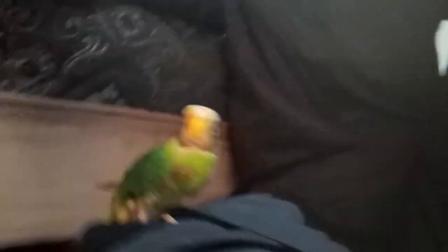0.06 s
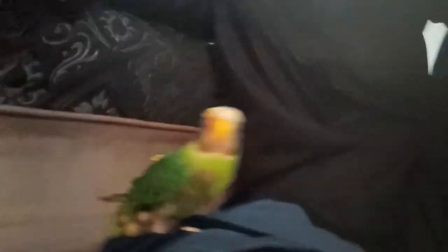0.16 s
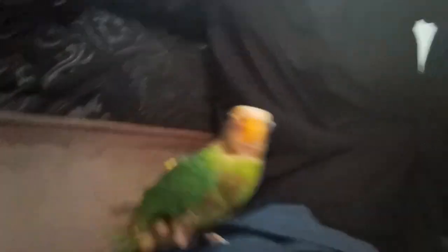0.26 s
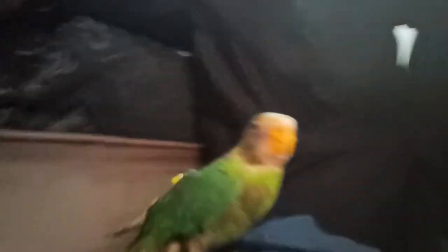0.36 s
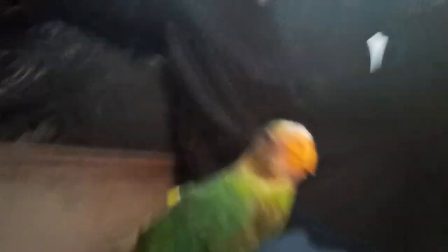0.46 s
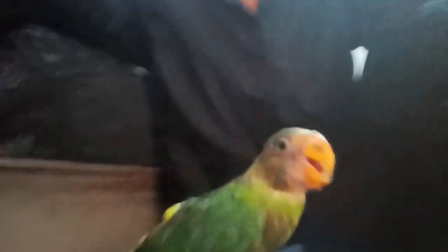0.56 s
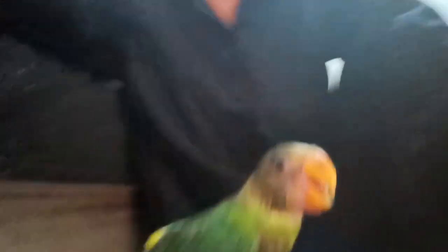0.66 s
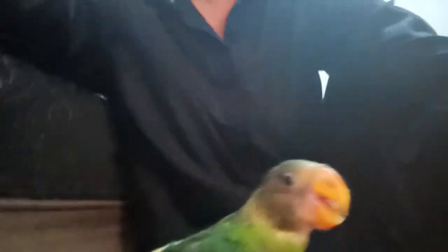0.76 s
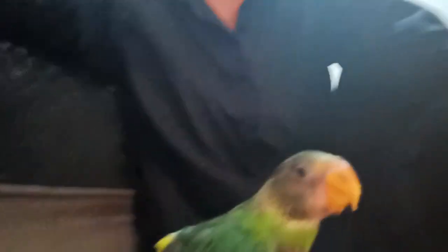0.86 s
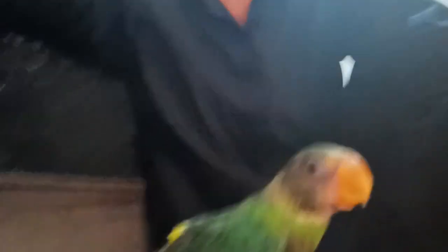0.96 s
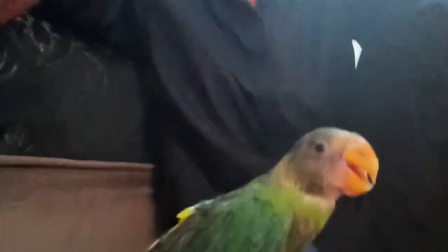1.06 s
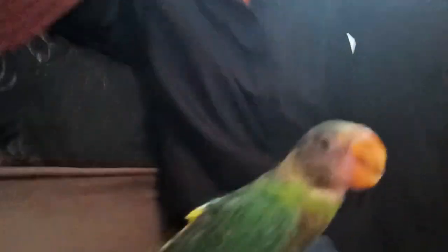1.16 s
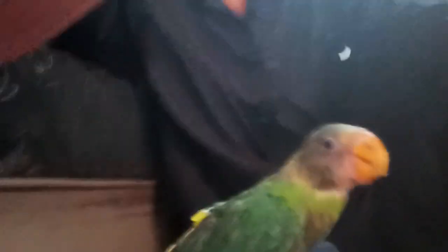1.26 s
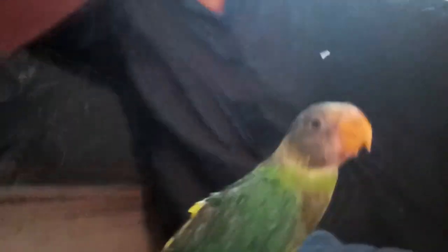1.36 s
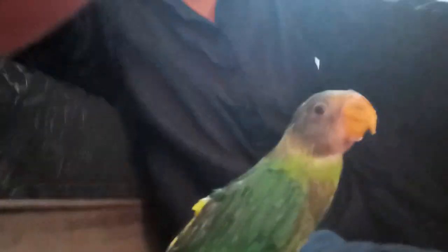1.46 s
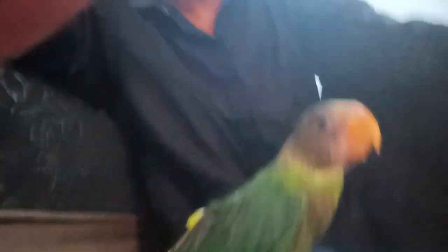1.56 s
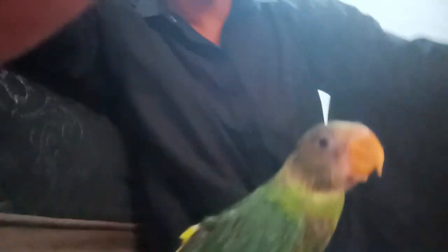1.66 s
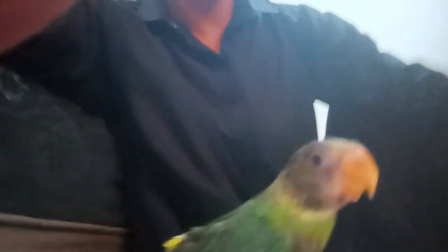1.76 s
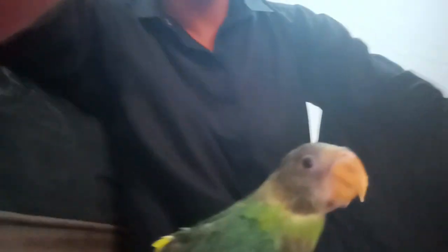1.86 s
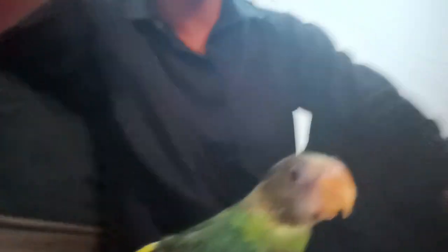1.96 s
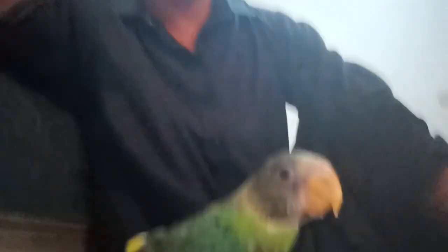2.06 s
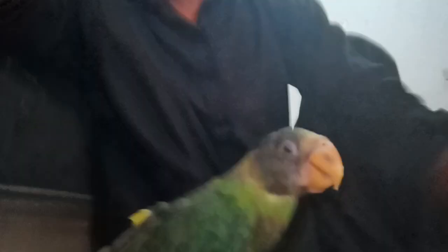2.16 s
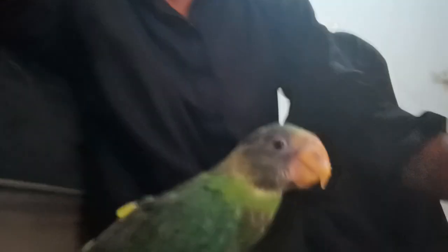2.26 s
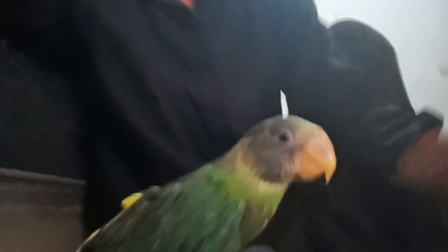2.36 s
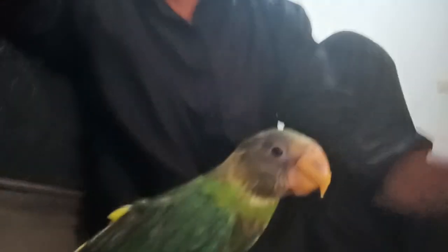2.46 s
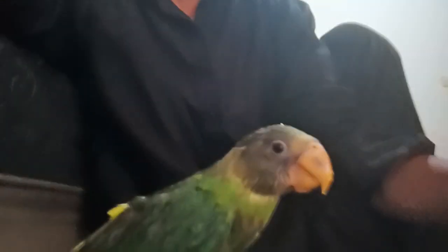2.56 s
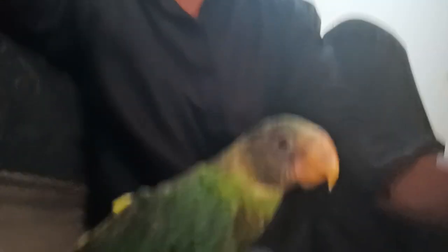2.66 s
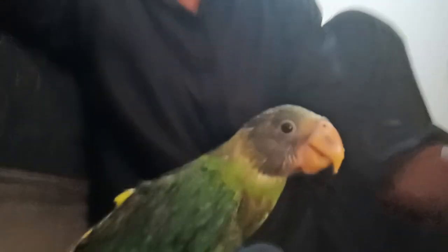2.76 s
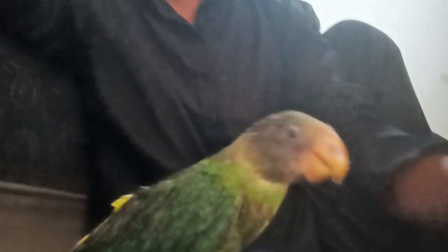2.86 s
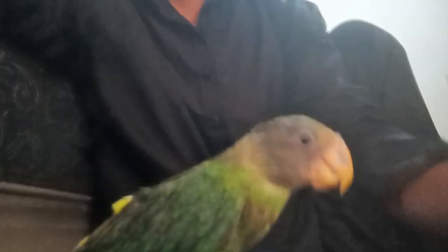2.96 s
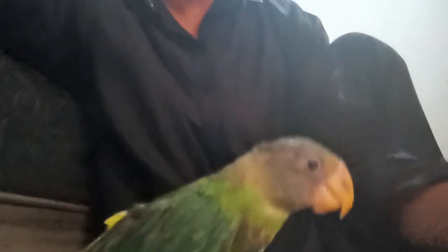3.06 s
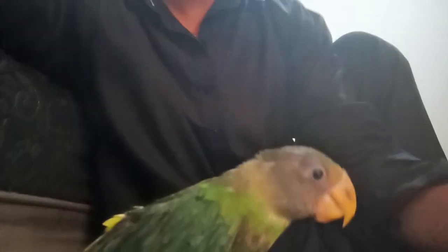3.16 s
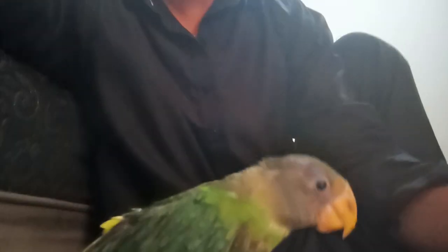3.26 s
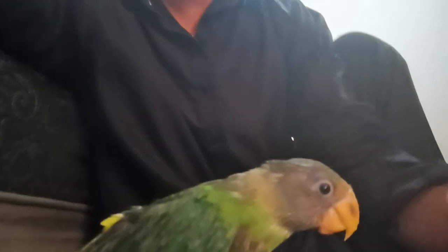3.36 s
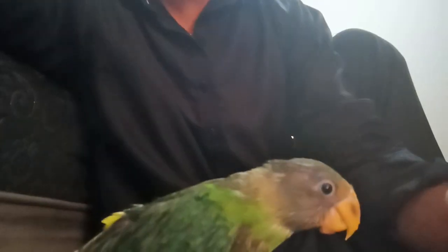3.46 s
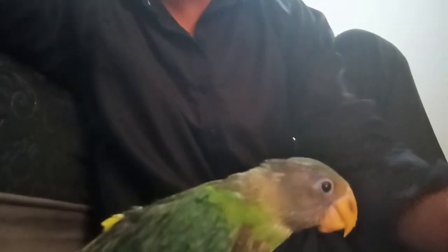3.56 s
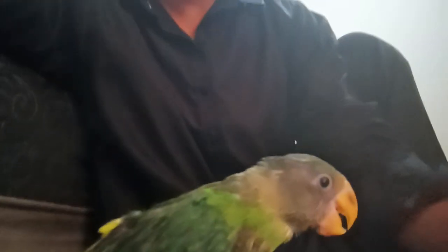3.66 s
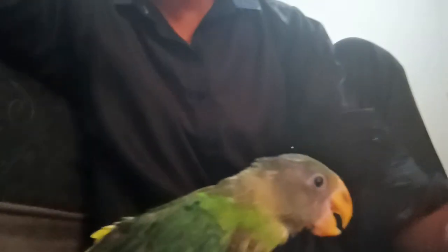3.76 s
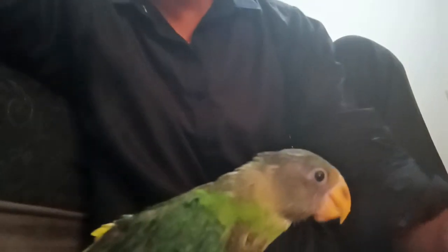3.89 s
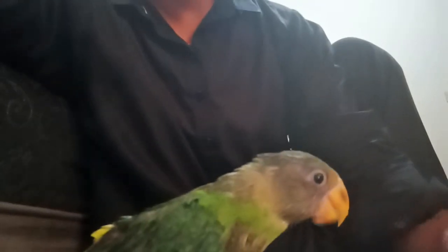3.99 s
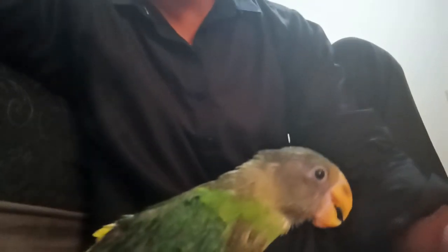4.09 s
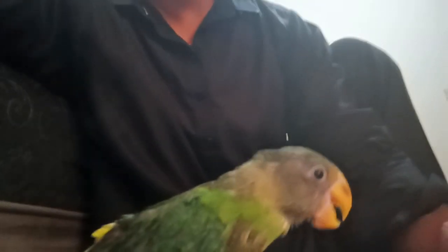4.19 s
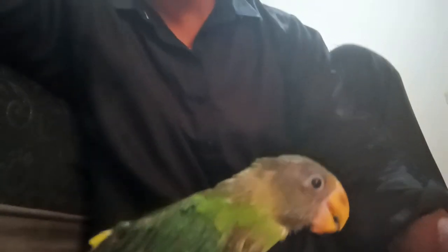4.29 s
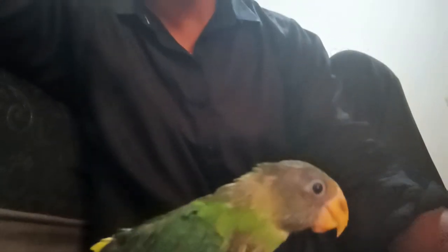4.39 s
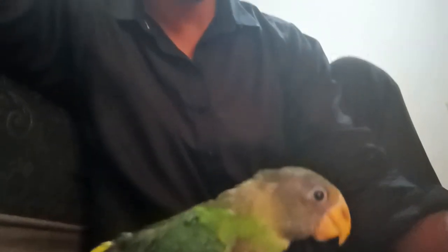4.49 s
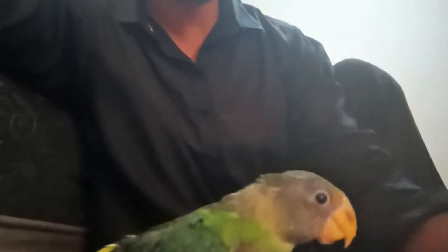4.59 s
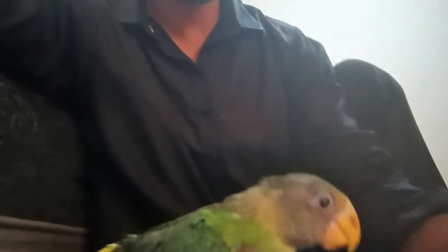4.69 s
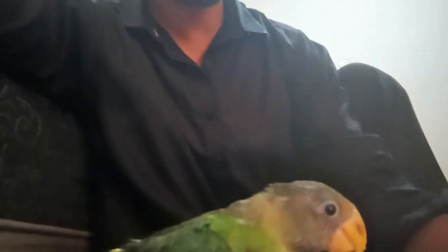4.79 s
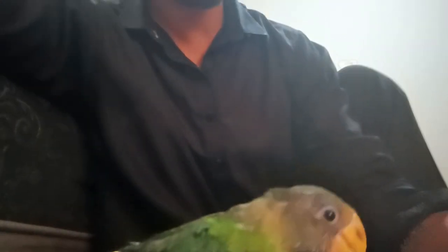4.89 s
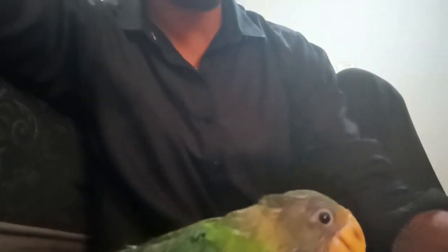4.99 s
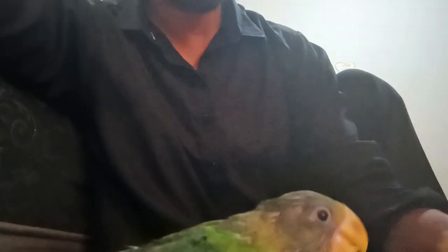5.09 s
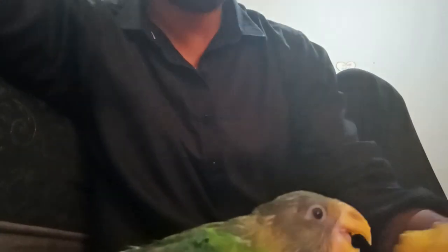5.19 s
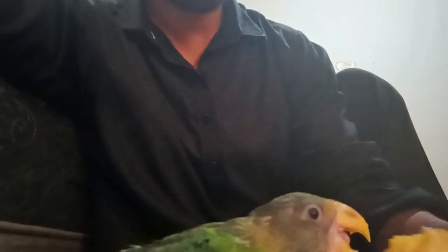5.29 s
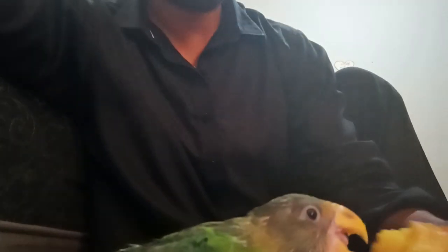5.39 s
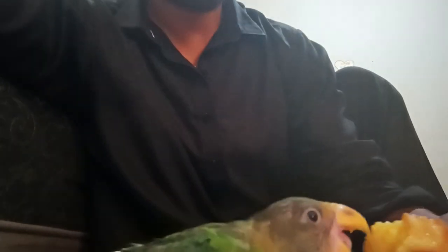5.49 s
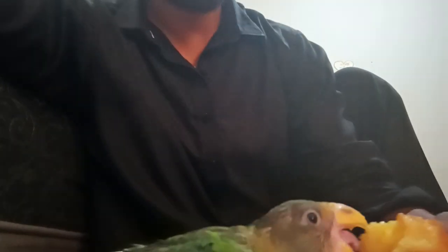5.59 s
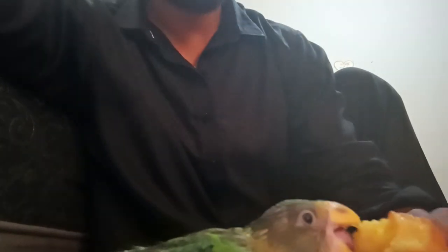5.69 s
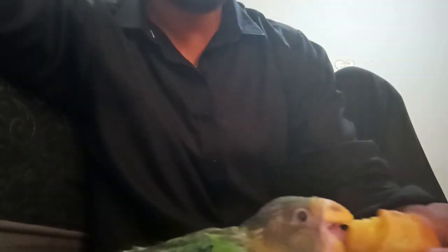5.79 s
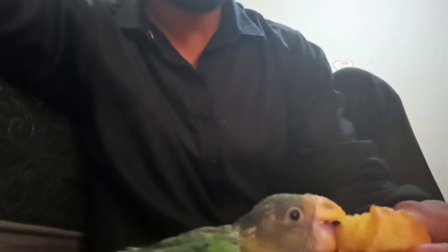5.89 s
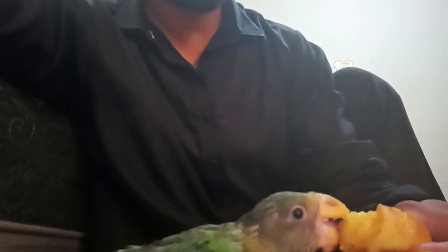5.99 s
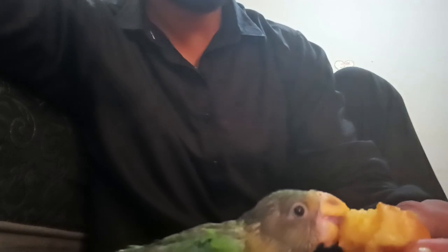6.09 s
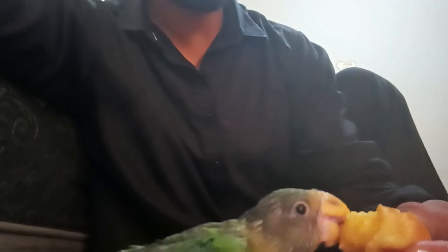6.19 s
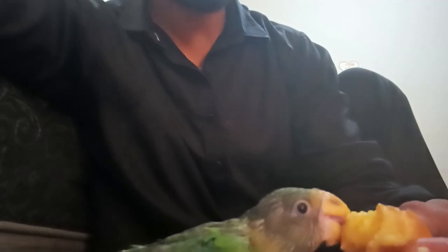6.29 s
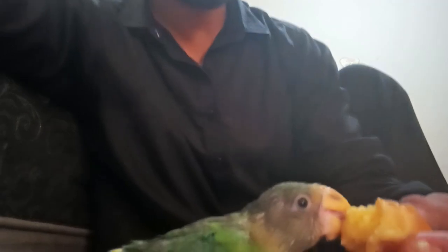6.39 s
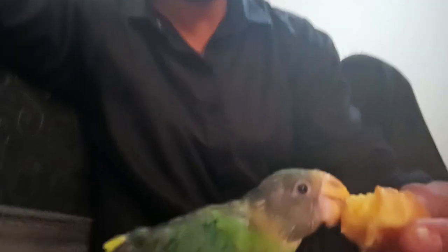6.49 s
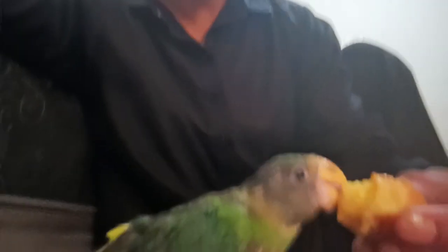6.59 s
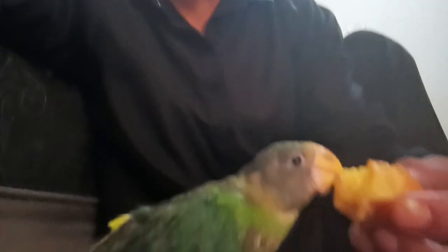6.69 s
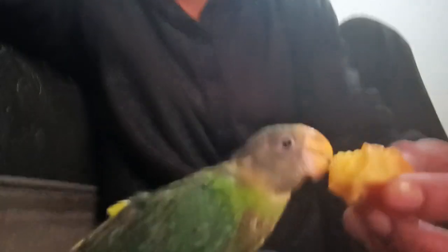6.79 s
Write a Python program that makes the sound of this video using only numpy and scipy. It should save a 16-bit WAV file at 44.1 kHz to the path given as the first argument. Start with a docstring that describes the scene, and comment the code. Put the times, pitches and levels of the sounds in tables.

```python
"""A small parrot close to the microphone gives two pairs of harsh squawks in a living room.
Each squawk is one harmonic tone whose base pitch rises, holds and falls at the end, while the
syrinx swings it up and down about sixty times a second; throat and beak filter it, the room reverberates.
Beak clicks are ticks of bright noise, knocks ring the recorder's case, hand bumps and a sleeve are shaped
noise, hum and hiss are steady coloured noise; gain control turns loud sound down."""
import sys
import numpy as np
from scipy import signal
from scipy.fft import rfft, irfft, next_fast_len
from scipy.io import wavfile
from scipy.ndimage import uniform_filter1d, minimum_filter1d

SR = 44100
rng = np.random.default_rng(int(sys.argv[2]) if len(sys.argv) > 2 else 0)


def transcribe(u):
    """Save the signal u as a 16-bit wav file named by the first command-line argument.

    u: samples, shape (n,) or (channels, n), limited to [-1, 1]; the rate is SR.
    q: integer samples, one column per channel.
    """
    v = np.clip(np.atleast_2d(u).T, -1, 1)
    q = np.round(v * 32767).astype(np.int16)
    wavfile.write(sys.argv[1], SR, q)


N = 301714
TIME = np.arange(N) / SR
CUTOFF_HZ = 15900     # upper edge of the recorded band
PLATEAU_HZ = 1836     # base pitch on the plateau, before each call's own pitch factor


def from_db(db):
    """Level to amplitude: 20 dB is a factor of ten."""
    return 10 ** (np.asarray(db) / 20)


def rms_one(x):
    """Normalization to unit mean-square power."""
    return x / np.sqrt(np.mean(x ** 2) + 1e-20)


def ramp(x):
    """Linear transition: x held between 0 and 1."""
    return np.clip(x, 0, 1)


def along(rows, at):
    """Piecewise-linear interpolation of every column of a table."""
    first, *columns = np.transpose(rows)
    return [np.interp(at, first, c) for c in columns]


def at_hz(points, hz):
    """Spectral interpolation on a logarithmic frequency axis."""
    f, value = np.transpose(points)
    return np.interp(np.log(np.maximum(hz, 1)), np.log(f), value)


def band(x, low_hz, high_hz):
    """Causal band-pass filtering (Butterworth)."""
    edges = [low_hz, min(high_hz, .45 * SR)]
    return signal.sosfilt(signal.butter(2, edges, "band", fs=SR, output="sos"), x + 1e-18)


def noise(spectrum):
    """Spectral shaping: white noise weighted by a colour, at unit power."""
    size = next_fast_len(N)
    white = rfft(rng.standard_normal(size))
    hz = np.arange(len(white)) * SR / size
    return rms_one(irfft(white * from_db(at_hz(spectrum, hz)), size)[:N])


def wander(rate_hz, size):
    """Band-limited random motion: random values joined by straight lines, spread 1."""
    steps = np.arange(size) * rate_hz / SR
    return rms_one(np.interp(steps, np.arange(size), rng.standard_normal(size)))


def taps(rows):
    """Impulse excitation: one impulse for each (t/s, level/dB) row."""
    out = np.zeros(N)
    for s, db in rows:
        out[int(s * SR)] = from_db(db)
    return out


def fading(rows, t60):
    """Exponential decay: an envelope that jumps at each event and falls 60 dB in t60 seconds."""
    return signal.lfilter([1], [1, -from_db(-60 / (t60 * SR))], taps(rows) + 1e-18)


def ring(clicks, hz, t60):
    """Damped resonance: a unit click sets a decaying sine of height 1 ringing."""
    r, w = from_db(-60 / (t60 * SR)), 2 * np.pi * hz / SR
    return signal.lfilter([0, np.sin(w)], [1, -2 * r * np.cos(w), r * r], clicks + 1e-18)


def parrot():
    """Superposition of direct sound and near reflections; the feed of the diffuse field is kept apart."""
    # the calls: start t/s, end t/s, level/dB, room send/dB, pitch factor, first warble trough t/s,
    # warble at start f/Hz, warble at end f/Hz, head turn [0-1], push at the start/dB, sag by the end/dB
    squawks = [(.464, .734, 0, -26.5, 0.98, .4868, 69.4, 56.85, 0, -1.5, -0.5),
               (.916, 1.173, 2.5, -25.5, .99, .9419, 64.65, 57.4, 0.29, 0, 5),
               (3.545, 3.807, -2.5, -20.5, 1.005, 3.570, 65.9, 61.3, 0.87, 0, 2.5),
               (3.988, 4.247, -3.5, -19.5, 1.025, 4.0175, 65.8, 55.13, 0.89, -1.5, 0)]
    # reflections off hard surfaces near the bird: delay t/s, level/dB
    near_echoes = [(.0013, -38.5), (.0034, -26.5), (.0061, -31), (.0093, -22)]
    direct, spread = np.zeros((2, N))
    for start, end, db, room_db, pitch, trough, *manner in squawks:
        call = from_db(db) * squawk(end - start, pitch, trough - start, *manner)
        at = int(start * SR)
        direct[at:at + len(call)] += call
        spread[at:at + len(call)] += from_db(room_db) * call
    echoes = sum(from_db(db) * np.interp(TIME - delay, TIME, direct) for delay, db in near_echoes)
    return direct + echoes, spread


def squawk(length, pitch, trough, start_hz, end_hz, turn, push_db, sag_db):
    """Source-filter principle: a frequency-modulated harmonic source drives throat and beak."""
    lean, crest = .45, 1.7             # asymmetry of the warble; exponent that narrows its troughs
    trough_drop_db, break_db, break_s = 5.5, 8, .007
    t = np.arange(int(length * SR)) / SR
    size = len(t)
    low, depth = tension(t / length)
    high = low * (1 + (1.68 - 1) * depth)    # at full depth the crest lies 1.68 times above the base
    effort_db, octave_db, slope_db, rasp = voice(low, depth)

    # the warble rate glides through the call; each swing climbs slowly, rounds off and drops fast
    turns = np.cumsum(start_hz + (end_hz - start_hz) * t / length) / SR
    angle = 2 * np.pi * (turns - np.interp(trough, t, turns))
    leaning = angle - lean * .5 * (1 - np.cos(angle))
    slack = (.5 + .5 * np.cos(leaning)) ** crest

    # the taut crests hold their pitch; the slack troughs stray, and the membranes beat unevenly
    sway = .025 * np.sqrt(slack) * wander(400, size)
    jitter = .04 * rasp * wander(3000, size)
    drift = .011 * wander(60, size)
    f0 = pitch * (high - (high - low) * slack) * (1 + sway + jitter + drift)
    phase = 2 * np.pi * np.cumsum(f0) / SR

    # the membranes close harder while the pitch climbs, which adds overtones
    slope_db = slope_db + 1.5 * np.sin(angle)
    tone = np.zeros(size)
    for k in range(1, 20):
        height = from_db(slope_db * np.log2(k) + octave_db * (k == 2)) * (k * f0 < CUTOFF_HZ)
        # they close in a rolling wave, so the overtones lag and each pulse is smeared
        partial = np.sin(k * phase + .49 * k * (k - 1))
        shimmer = 1 + .55 * rasp * np.log2(k + 1) * .5 * wander(2000, size)
        tone += height * partial * shimmer
    # in the rasp, strong and weak cycles alternate in short spells
    tone = tone * (1 + .38 * rasp * wander(250, size) * np.sin(phase / 2))
    # air escapes in a puff on every cycle
    air = from_db(-22) * np.sqrt(rasp.clip(0)) * rng.standard_normal(size) * (1 + np.cos(phase))

    # the flow is weakest just before each trough; the first one has an extra drop
    shut = (.5 + .5 * np.cos(angle + .22)) ** 2
    drop_db = trough_drop_db * depth + break_db * np.exp(-((t - trough) / break_s) ** 2)
    # each call starts softly and swells
    swell_db = -9.5 * np.exp(-t / .012) + push_db * np.exp(-t / .063)
    uneven_db = .8 * wander(120, size)
    level_db = effort_db + swell_db - sag_db * (t / length) ** 2 - drop_db * shut + uneven_db
    edges = ramp(t / .001) * ramp((length - t) / .0068)
    return throat((tone + air) * edges * from_db(level_db), ramp(turn))


def tension(share):
    """Membrane tension sets pitch: base pitch in Hz and warble depth (0-1) by share of the call's length."""
    start_hz, scoop_hz, end_hz = 596.7, 1000, 1153
    scoop = (start_hz - scoop_hz) * np.exp(-share / .04)
    climb = scoop_hz + (PLATEAU_HZ - scoop_hz) * ramp(share / .48)
    fall = (end_hz - PLATEAU_HZ) * ramp(1 - (1 - share) / .11)
    # the warble sets in after the start and stops during the fall
    depth = ramp((share - .05) / .07) * ramp((1 - share - .052) / .05)
    return scoop + climb + fall, depth


def voice(base_hz, depth):
    """Source strength and spectrum follow tension: below the plateau a slack syrinx is weaker and raspier."""
    octaves = np.log2(PLATEAU_HZ / base_hz)
    effort_db = 5 - 5.5 * octaves
    second_harmonic_db = 2.3 + 5.5 * octaves * depth
    overtone_slope_db = -5             # per octave of harmonic number
    # rasp (0-1) grows faster with slackness while the tone warbles than while it is steady
    rasp_per_octave = .16 * (1 - depth) + 1.0 * depth
    return effort_db, second_harmonic_db, overtone_slope_db, ramp(.17 + rasp_per_octave * octaves)


def throat(source, turn):
    """Vocal-tract resonance: a minimum-phase filter coloured by throat, beak and head direction."""
    # response heard from the front: f/Hz, level/dB
    beak_front = [(600, -19.5), (1300, -13), (1900, -4.5), (2450, 6), (3100, 1), (3500, -8), (4200, -0.5),
                  (5200, -5.5), (6150, -3), (7000, -13.5), (8400, -11.5), (9600, -19.5), (13000, -21),
                  (15000, -17.5)]
    # response with the head turned: f/Hz, level/dB
    beak_turned = [(600, -18.5), (1300, -15), (1900, -6.5), (2500, -8), (3100, 0), (3600, -1.5),
                   (4200, -2.5), (5400, -5.5), (6200, -1.5), (7100, -18.5), (8200, -4), (9600, -7.5),
                   (11000, -23), (14800, -15)]
    size = 2 ** 14
    hz = np.arange(size // 2 + 1) * SR / size
    gain = from_db((1 - turn) * at_hz(beak_front, hz) + turn * at_hz(beak_turned, hz))
    # folding the cepstrum onto positive time makes the filter minimum-phase
    fold = np.r_[1, np.full(size // 2 - 1, 2), 1, np.zeros(size // 2 - 1)]
    causal = np.exp(rfft(irfft(np.log(gain)) * fold))
    return irfft(rfft(source, size) * causal)


def beak_clicks():
    """Transient broadband radiation: tiny bright ticks of decaying noise."""
    # small clicks of the beak: t/s, level/dB
    ticks = [(2.952, -57), (4.612, -50.5), (4.953, -55), (6.68, -58)]
    return band(rng.standard_normal(N) * fading(ticks, t60=.03), 4000, 15500)


def room(x):
    """Diffuse reverberation: convolution with octave bands of noise, each with its own decay time."""
    # reverberation time: f/Hz, t60/s
    room_t60 = [(300, 0.15), (3000, 0.4), (6000, 0.36), (15000, 0.24)]
    gap_s, wet_db = .0073, 2.5
    t = TIME[:SR * 3 // 4]
    edges = np.geomspace(250, 16000, 7)
    tail = np.zeros(len(t))
    for lo, hi in zip(edges, edges[1:]):
        decay = from_db(-60 * t / at_hz(room_t60, np.sqrt(lo * hi)))
        tail += band(rng.standard_normal(len(t)), lo, hi) * decay
    tail = tail * (t > gap_s)
    return from_db(wet_db) * signal.fftconvolve(x, tail / np.linalg.norm(tail))[:N]


def handling():
    """Structure-borne sound: knocks excite modes of the recorder's case; the hand adds dull thuds."""
    # sharp knocks on the recorder: t/s, relative level/dB
    knocks = [(.9755, 7), (1.001, -3.5), (1.009, 0), (1.018, -10)]
    # modes of its case: f/Hz, relative level/dB, t60/s
    case = [(139, -21, 0.031), (470, -15, 0.027), (870, 2.5, 0.0028)]
    # firm bumps of the hand: t/s, relative level/dB
    bumps = [(1.314, -23), (1.359, -27.5), (1.498, -34.5), (1.807, -34.5), (2.122, -31), (3.843, -27),
             (3.884, -36), (4.519, -33), (4.659, -29.5), (6.029, -40), (6.617, -33), (6.757, -33)]
    ringing = sum(from_db(db + 2) * ring(taps(knocks), hz, t60) for hz, db, t60 in case)
    # colour of the thuds: f/Hz, level/dB
    thud = noise([(25, -27), (55, 0.5), (85, 2), (130, 0.5), (220, -13.5), (600, -24.5)])
    thuds = band(thud * fading([*bumps, *fidgets()], t60=0.27), 35.7, 420)
    return ringing + from_db(-0.5) * thuds


def fidgets():
    """Random point process: light shifts of the fingers as rows of t/s, relative level/dB."""
    per_s, middle_db, spread_db = 3, -45.5, 1
    draws = rng.random((int(per_s * N / SR), 2))
    return [(when * TIME[-1], middle_db + spread_db * (2 * size - 1)) for when, size in draws]


def sleeve():
    """Friction noise: a faint, bright brush of cloth that rises, holds and fades."""
    # colour of the brush: f/Hz, relative level/dB per Hz
    cloth = [(3000, -10), (8000, 0), (11000, -12), (12800, -4), (15500, -20)]
    start_s, rise_s, fade_after_s, fade_db_per_s = 5.18, .03, .11, 180
    t = TIME - start_s
    level_db = -61 - fade_db_per_s * np.maximum(t - fade_after_s, 0)
    return noise(cloth) * ramp(t / rise_s) * from_db(level_db)


def background():
    """Stationary noise spectra under slow level curves: room hum, fine hiss and a fuller early hiss."""
    # room hum: f/Hz, relative level/dB per Hz
    hum = [(44, -55), (75, -27), (91, -12), (118, -14.5), (235, -1.5), (335, -3), (374, -1.5), (657, -14),
           (808, -15.5), (1030, -4.5), (1340, -12.5), (1400, -13), (1720, -13.5), (2000, -20),
           (2600, -54.5), (4400, -120)]
    # fine hiss: f/Hz, relative level/dB per Hz
    hiss = [(1000, -7.5), (1700, -4.5), (1900, -0.5), (3630, -14), (4220, -18), (7410, -33.5), (9370, -34),
            (10400, -42.5), (13000, -47.5), (16000, -55)]
    # course of the fine hiss, low at first, which comes up during the first pair of calls:
    # t/s, relative level/dB
    hiss_level = [(0, -9), (.45, -10.5), (1.3, 2), (6.84, 0)]
    # fuller hiss at the start, which fades out from the second call on: f/Hz, relative level/dB per Hz
    early_hiss = [(700, -5.5), (1400, -4.5), (2000, -4), (2750, -8), (3300, -19.5), (4300, -33),
                  (6700, -38.5), (8000, -55.5)]
    # course of the fuller hiss: t/s, level/dB
    early_level = [(0, -36.5), (.9, -38), (1.3, -82)]
    steady = from_db(-36) * noise(hum)
    steady = steady + from_db(-45.5 + along(hiss_level, TIME)[0]) * noise(hiss)
    rise_db = .36 * (TIME - TIME.mean())    # a slow rise of 0.36 dB each second on hum and fine hiss
    early = noise(early_hiss) * from_db(along(early_level, TIME)[0])
    return steady * from_db(rise_db) + early


def scene():
    """Linear superposition of bird, room, handling and background at one microphone."""
    direct, spread = parrot()
    clicks = beak_clicks()
    reverberant = room(spread + from_db(-5.5) * clicks)
    return (direct + clicks + reverberant + handling() + sleeve() + background())[None]


def gain_control(x):
    """Dynamic compression: the gain drops quickly above the limit and creeps back afterwards."""
    limit_db, release_db_per_s, window_s, attack_s = -11.0, 110, .016, .0019
    power = uniform_filter1d(x ** 2, max(int(window_s * SR), 1))
    level_db = 10 * np.log10(power.clip(1e-12))
    recovery = release_db_per_s * TIME
    excess_db = np.maximum(level_db - limit_db, 0)
    # a running maximum on a rising slope lets the cut shrink at a constant rate
    cut_db = np.maximum.accumulate(excess_db + recovery, axis=-1) - recovery
    return x * from_db(-uniform_filter1d(cut_db, max(int(attack_s * SR), 1)))


def limiter(x, size=45):
    """Look-ahead peak limiting: about a millisecond early, turns down peaks that would pass the ceiling."""
    ceiling = .9
    gain = ceiling / np.maximum(np.abs(x), ceiling)
    return x * uniform_filter1d(minimum_filter1d(gain, 2 * size), size)


def record(dry):
    """Band limitation and compression: deep bass cut, gain control, peak limiter, then top cut."""
    heard = signal.sosfilt(signal.butter(4, 60, "high", fs=SR, output="sos"), dry)
    top = signal.ellip(12, .1, 80, CUTOFF_HZ, fs=SR, output="sos")
    return signal.sosfilt(top, limiter(gain_control(heard)))


dry = scene()
out = record(dry)
transcribe(out)
```